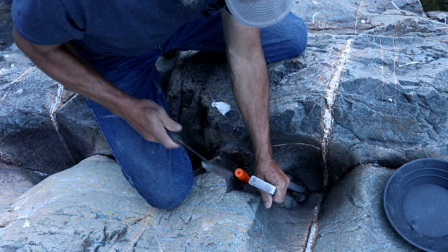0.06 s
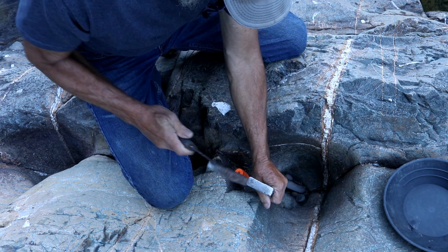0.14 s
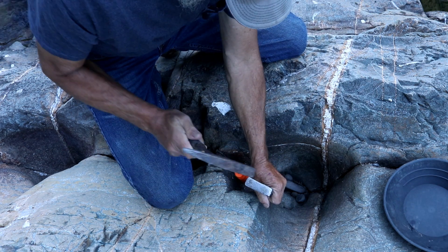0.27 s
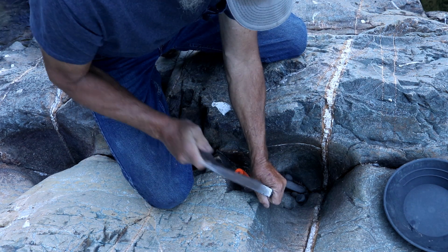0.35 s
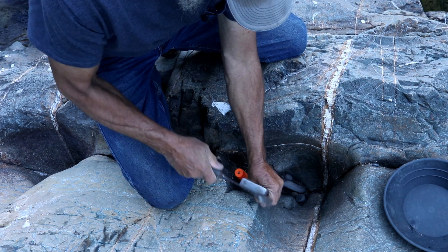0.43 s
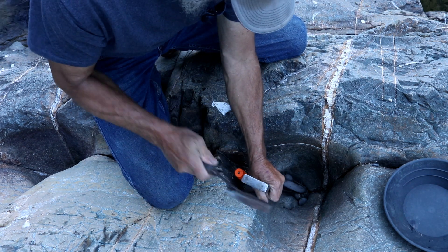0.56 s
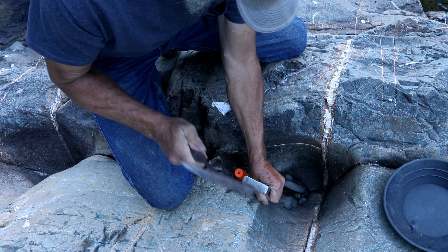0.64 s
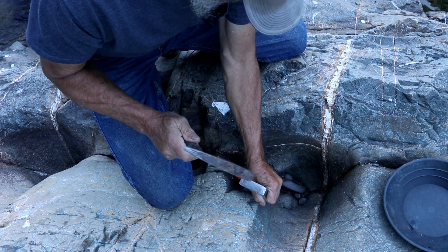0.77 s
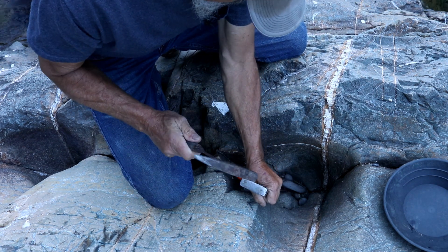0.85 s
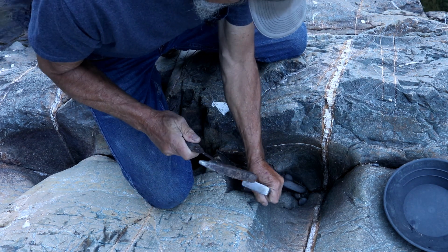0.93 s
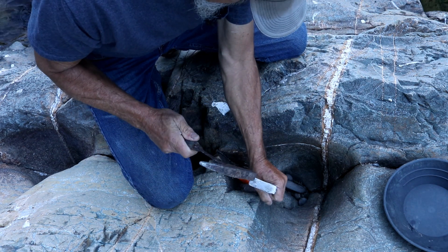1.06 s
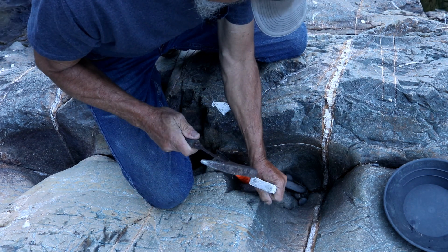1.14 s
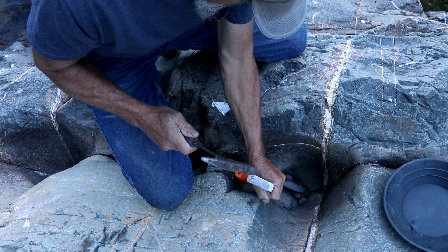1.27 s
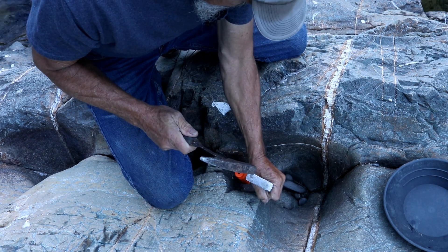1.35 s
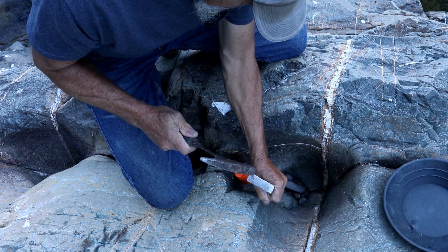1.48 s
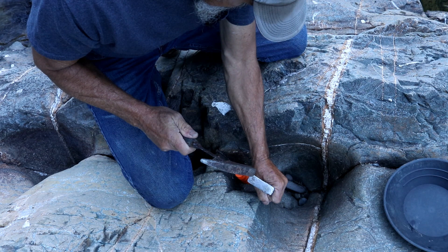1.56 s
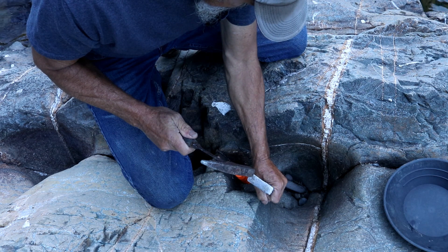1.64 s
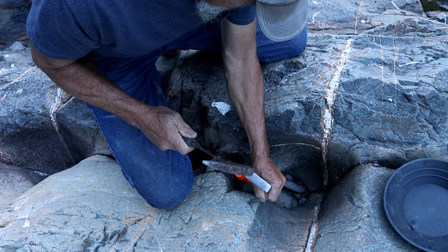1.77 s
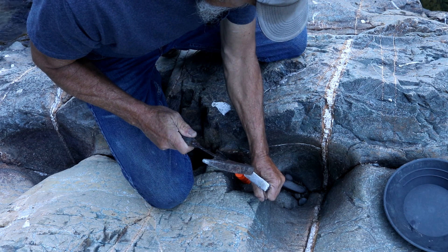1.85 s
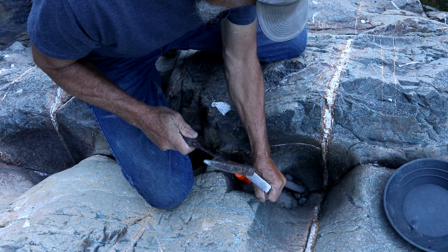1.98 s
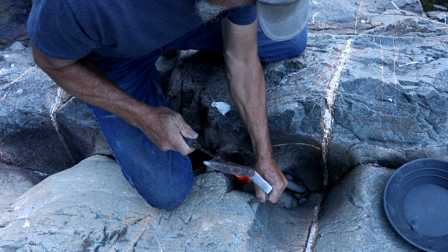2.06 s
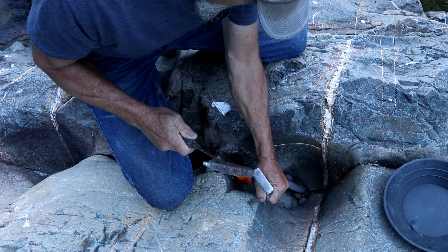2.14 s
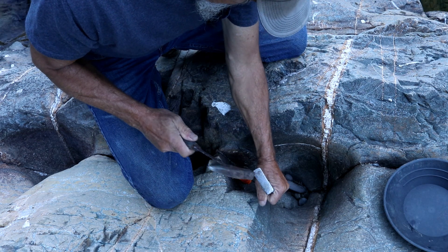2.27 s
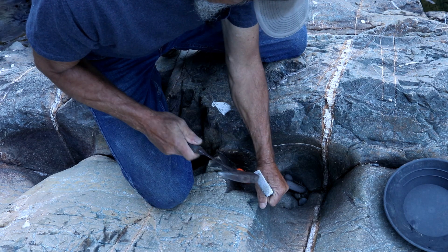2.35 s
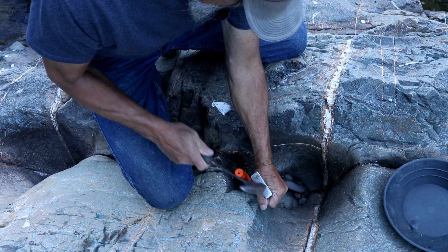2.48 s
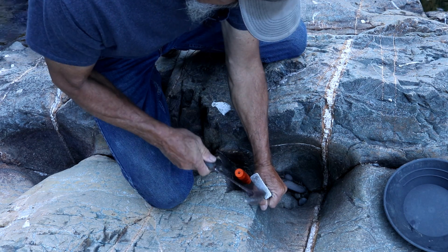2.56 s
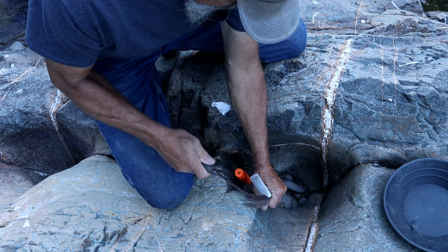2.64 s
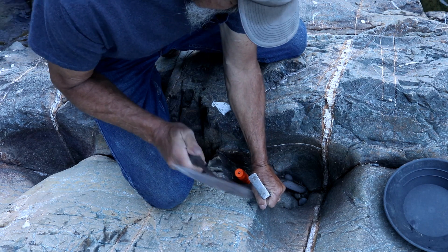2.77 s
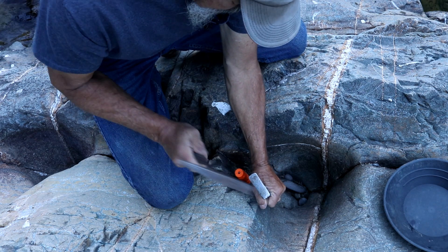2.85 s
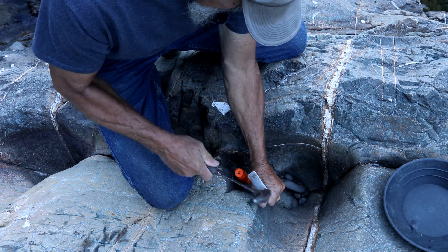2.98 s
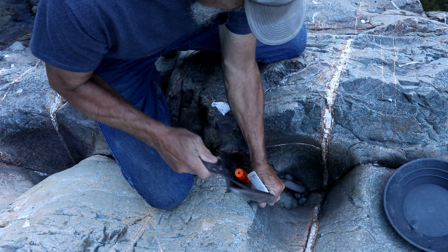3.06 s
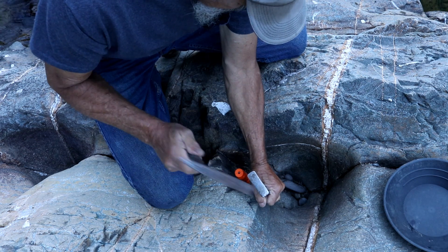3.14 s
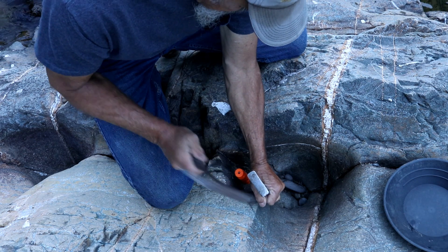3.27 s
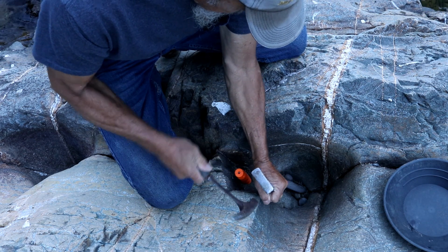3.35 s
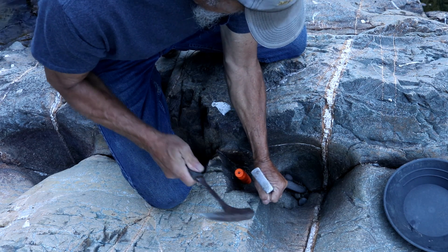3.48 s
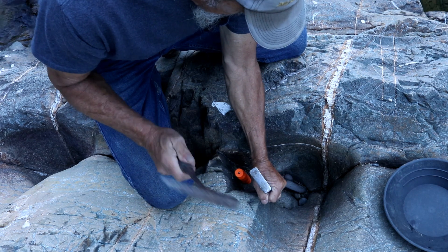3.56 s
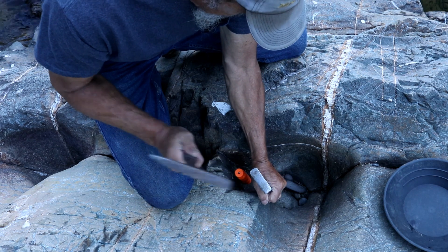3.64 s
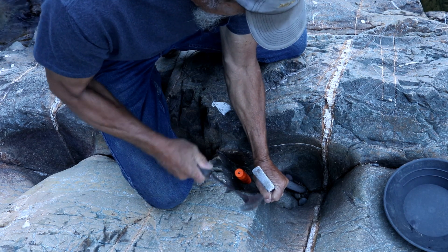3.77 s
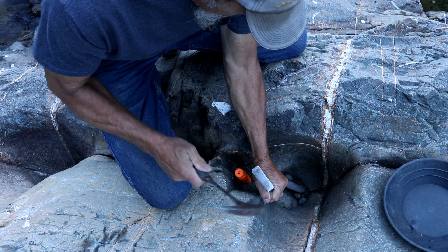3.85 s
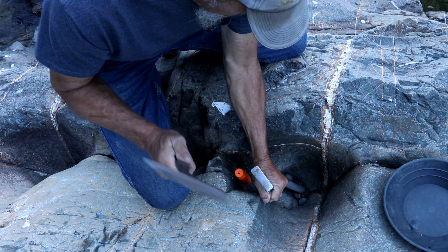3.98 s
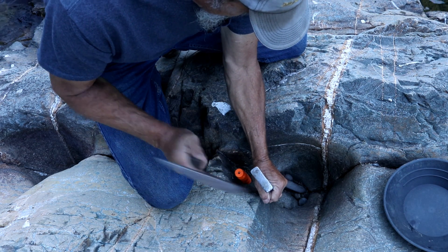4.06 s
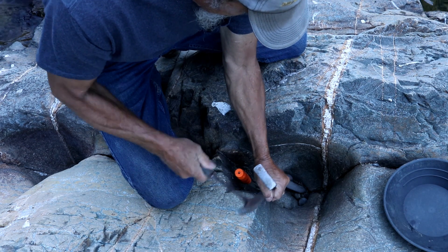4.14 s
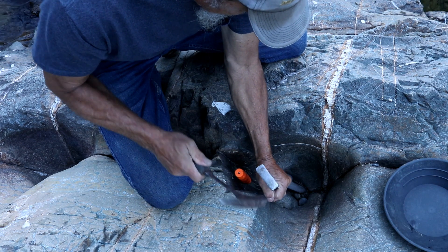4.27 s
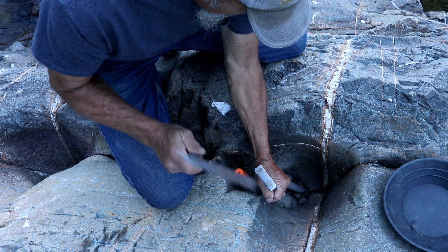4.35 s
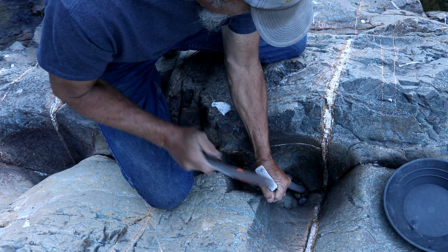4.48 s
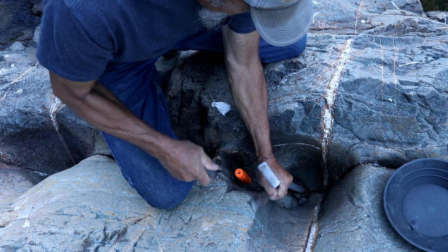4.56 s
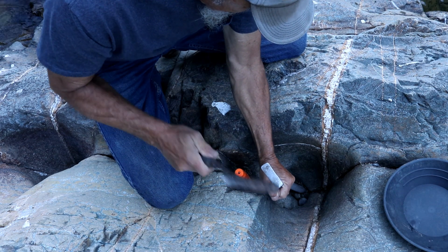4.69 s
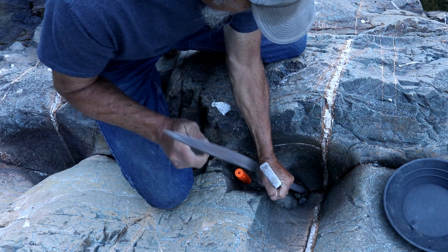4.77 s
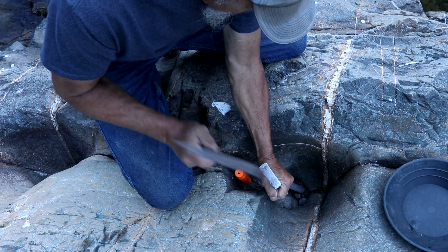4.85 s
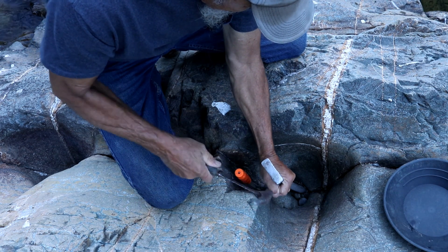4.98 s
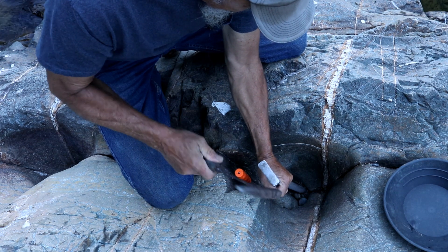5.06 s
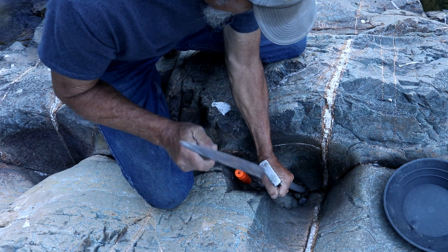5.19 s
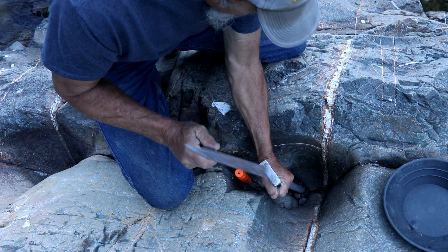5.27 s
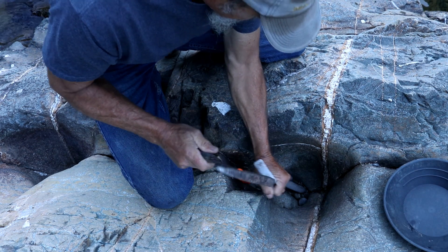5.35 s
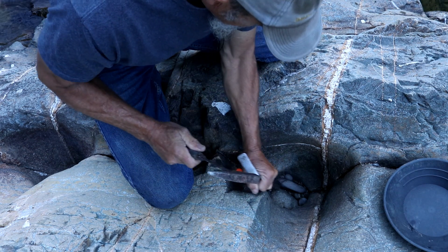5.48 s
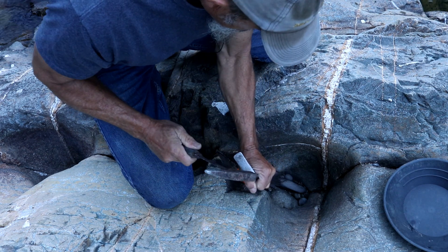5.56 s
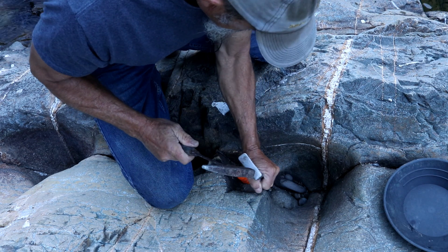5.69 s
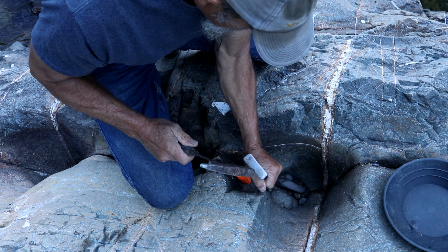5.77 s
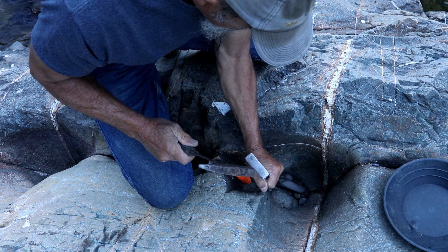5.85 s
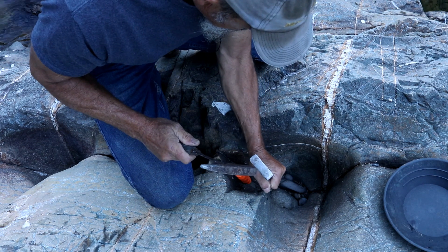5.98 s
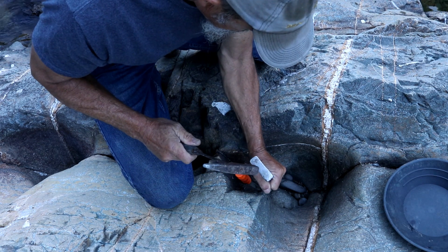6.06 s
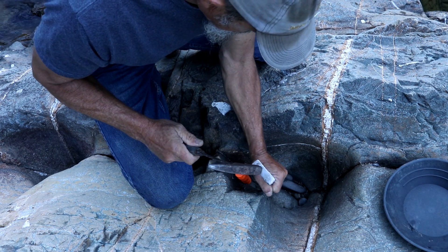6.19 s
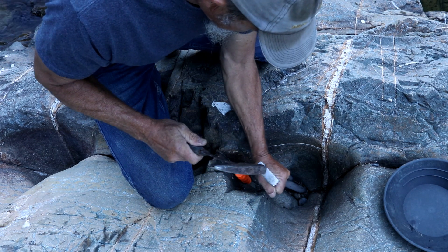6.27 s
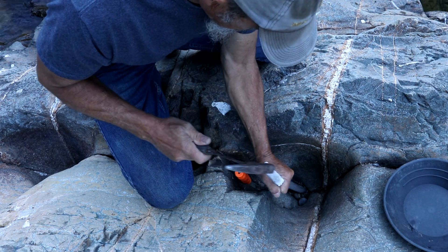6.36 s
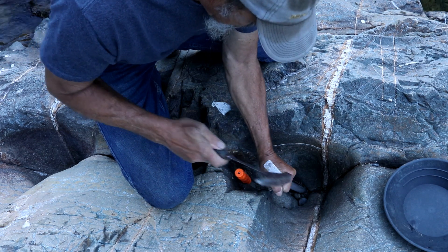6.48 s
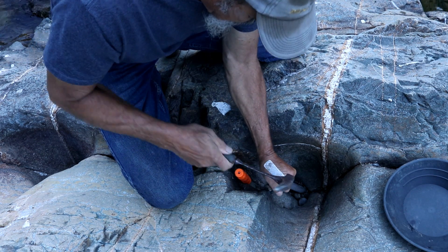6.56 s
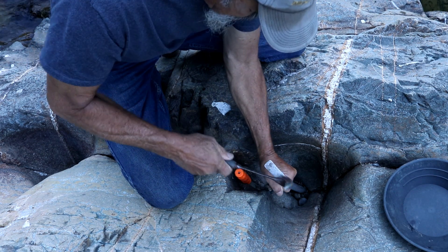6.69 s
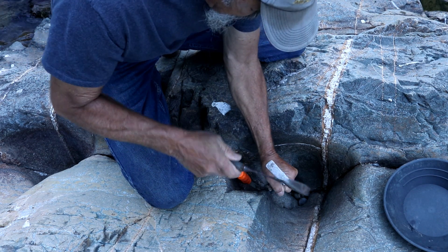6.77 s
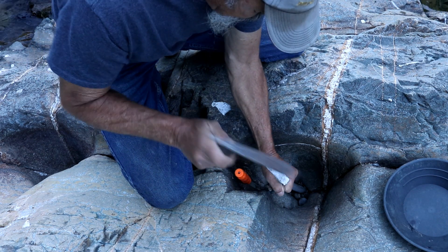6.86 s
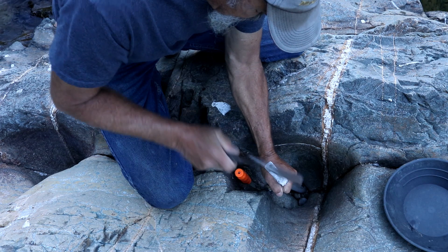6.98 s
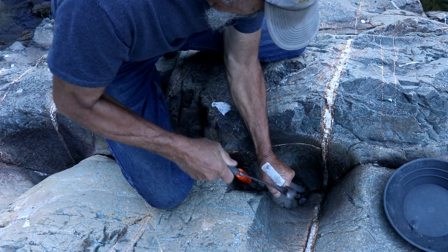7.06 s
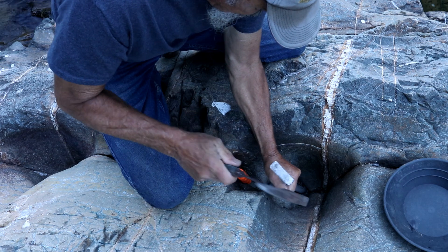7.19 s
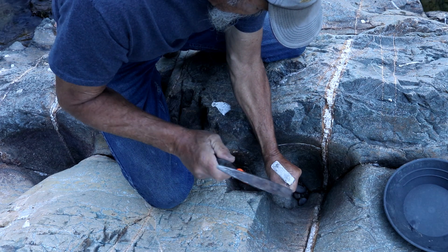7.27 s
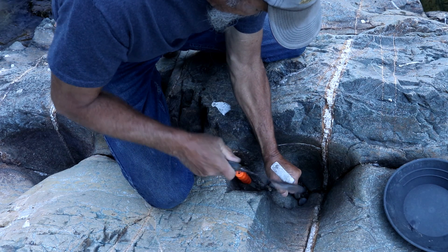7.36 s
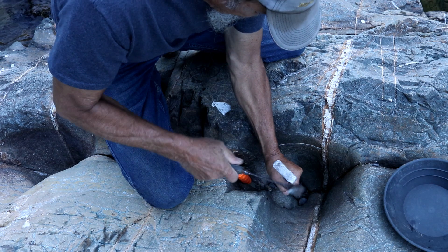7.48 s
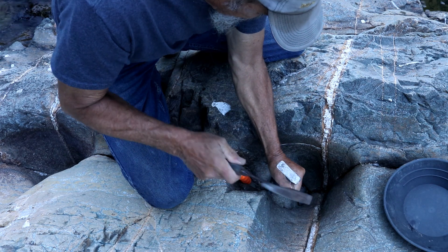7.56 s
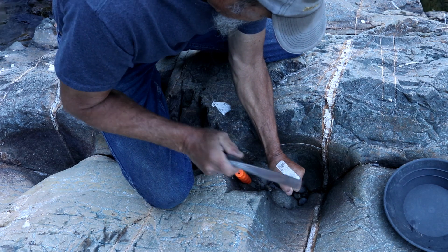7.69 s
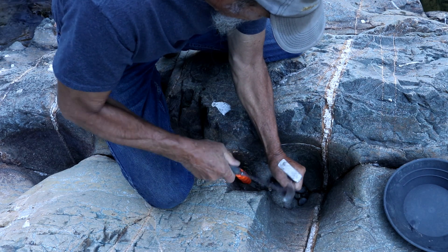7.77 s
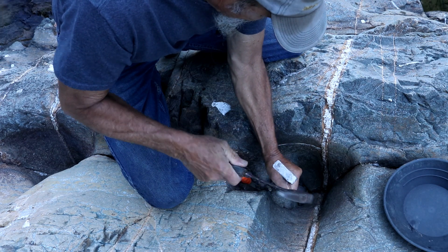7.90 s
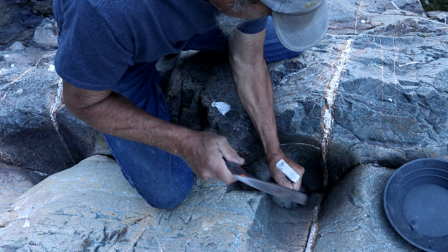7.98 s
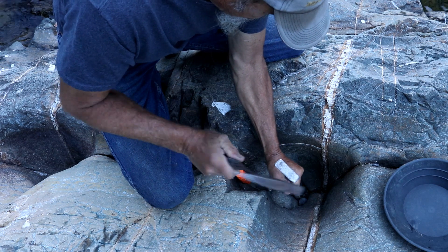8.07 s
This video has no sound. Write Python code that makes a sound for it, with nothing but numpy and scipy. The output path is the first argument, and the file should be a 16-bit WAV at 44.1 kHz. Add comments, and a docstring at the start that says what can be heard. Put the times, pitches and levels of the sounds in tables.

```python
"""Beside a stream, a hammer drives a steel tool into a rock crevice.
Each blow is a gritty crack of crushed rock (decaying noise), a short steel ring and a thud (decaying sines).
The blows can overload the microphone; after some, the hammer drops back on the steel more weakly.
Nearby rock faces throw the sounds back, as smeared echoes and a thin scatter.
Between the bursts the tools touch the stone and each other lightly; the stream is steady, churning noise."""
import sys
import numpy as np
from scipy import signal
from scipy.io import wavfile

SR = 44100
rng = np.random.default_rng(int(sys.argv[2]) if len(sys.argv) > 2 else 0)


def store_wav(level_fs):
    """Save 16-bit WAV to argv[1]."""
    pcm = np.round(np.clip(np.atleast_2d(level_fs), -1, 1) * 32767)
    wavfile.write(sys.argv[1], SR, pcm.T.astype(np.int16))


N = 358533   # length of the scene in samples
BAND_EDGES_HZ = 22 * 2 ** np.arange(0, 9.9, 1 / 3)   # three bands to the octave


def from_db(db):
    """Turn decibels into a gain."""
    return 10 ** (np.asarray(db) / 20)


def rms_one(x):
    """Scale a sound to an rms level of one."""
    return x / np.sqrt(np.mean(x ** 2) + 1e-20)


def at_hz(points, hz):
    """Read a table of (Hz, value) between its points, on a log-frequency axis."""
    table_hz, values = np.array(points).T
    return np.interp(np.log(hz), np.log(table_hz), values)


def add(out, start_s, sound):
    """Mix a sound in at a time in seconds."""
    start = round(start_s * SR)
    out[start:start + len(sound)] += sound[:N - start]


def low_pass(x, hz):
    """Dull a sound gently above a frequency, with one pole."""
    return signal.sosfilt(signal.butter(1, hz, fs=SR, output="sos"), x)


def fade(t, t60):
    """Decay exponentially, reaching 60 dB down after t60 seconds."""
    return np.exp(-np.log(1000) * t / t60)


def mode(t, hz, t60):
    """One struck mode: a decaying sine of unit height that starts up or down at random."""
    sign = rng.choice([-1, 1])
    return sign * np.sin(2 * np.pi * hz * t) * fade(t, t60)


def noise_bands(size):
    """Give third-octave bands of unrelated noise, each as (centre Hz, samples)."""
    settling = SR // 4   # samples dropped while the filter settles
    for low, high in zip(BAND_EDGES_HZ, BAND_EDGES_HZ[1:]):
        band = signal.butter(2, [low, high], "band", fs=SR, output="sos")
        noise = signal.sosfilt(band, rng.standard_normal(size + settling))
        yield np.sqrt(low * high), noise[settling:]


def drift(rate):
    """Wander slowly through random points of unit spread, `rate` points a second."""
    points = rng.standard_normal(N // 100)
    return np.interp(np.arange(N) / SR * rate, np.arange(len(points)), points)


# The tone of the running water.
# Each row: frequency in Hz, relative level in dB per Hz.
STREAM_SPECTRUM = [(15, -65.5), (25, -21.5), (75, -4), (178, 1), (240, -8), (274, 1), (349, -3), (389, -4),
                   (804, -8.5), (1200, -15.5), (2920, -22), (9300, -34.5), (15500, -42)]


def stream(level_db=-36.5, churn_db=0.18, churn_rate=22):
    """Running water some way off: a soft rush of noise whose bands churn independently."""
    rush = 0
    for hz, noise in noise_bands(N):
        band_db = at_hz(STREAM_SPECTRUM, hz) + churn_db * drift(churn_rate)
        rush = rush + noise * from_db(band_db)
    return from_db(level_db) * rms_one(rush)


# The tone of rock crushed under the tip.
# Each row: frequency in Hz, relative level in dB per Hz.
CRUSH_SPECTRUM = [(40, -30), (120, -9.5), (300, -6.5), (900, -6), (1700, -1.5), (2200, -12.5), (2800, -6),
                  (4000, -4.5), (4800, 1), (5900, -11.5), (6900, -0.5), (9000, -15.5), (12000, -14),
                  (16000, -22.5)]
# How fast crushed rock falls silent at a force of 0 dB.
# Each row: frequency in Hz, time to fall by 60 dB in seconds.
CRUSH_DECAY = [(200, 0.027), (1500, 0.024), (3000, 0.038), (6000, 0.036), (14000, 0.035)]


def cracks(t, forces_db, stretch_per_db=0.1461):
    """One burst of crushing rock per force; each band dies at its own rate, and light blows die sooner."""
    stretch = np.exp(stretch_per_db * np.maximum(forces_db, -20))[:, None]
    steady, dying = 0, 0
    for hz, noise in noise_bands(len(forces_db) * len(t)):
        band = from_db(at_hz(CRUSH_SPECTRUM, hz)) * noise.reshape(len(forces_db), -1)
        steady = steady + band
        dying = dying + band * fade(t, at_hz(CRUSH_DECAY, hz) * stretch)
    return dying / np.std(steady)   # unit level before the decay


def chatter(t, depth=0.0044, rate=400):
    """Time that runs unevenly, as the tool rubs in its seat; `rate` is random speed points a second."""
    wobble = np.interp(t * rate, np.arange(len(t)), rng.standard_normal(len(t)))
    return t + depth * np.cumsum(wobble) / SR


# The ways the steel in the crevice can ring; the modes of one family are struck together.
# Each row: family, frequency in Hz, level within the family in dB,
# basic time to fall by 60 dB in seconds.
STEEL_MODES = [("bend", 2716, 0, .052), ("shaft", 3892, -5, .052), ("shaft", 10004, -2, .038),
               ("shank", 4648, 0, .048), ("clang", 2480, -8, .03), ("clang", 2975, -6, .036),
               ("clang", 4560, -3, .03), ("clang", 5285, 0, .034), ("clang", 5430, -5, .026),
               ("clang", 5820, -9, .025), ("clang", 6800, -3, .031), ("clang", 8480, -13, .028),
               ("seat", 1720, -8, .03), ("seat", 3445, -1, .042), ("seat", 4780, 5, .032),
               ("seat", 6120, -6, .025), ("neck", 4940, 0, .052), ("neck", 3300, -9, .048),
               ("neck", 6250, -10, .025), ("chime", 10015, 0, .04), ("chime", 10265, -2, .036),
               ("chime", 10590, -3, .036), ("chime", 12420, -14, .03), ("chime", 12700, -14, .035),
               ("chime", 13250, -15, .03), ("face", 11122, 0, .066)]
# How loud each family is under a blow of 0 dB that does not favour it.
# Each entry: family, level in dB.
FAMILY_LEVELS = {"bend": 0, "shaft": -7, "shank": -1, "clang": -1, "seat": -8.5, "neck": -7, "chime": -7.5,
                 "face": -8}


def steel(t, favoured, lead_db, length, seats_s, seated_t60=0.021, scatter_db=1.26, detune=0.0013):
    """The ring of struck steel; where the hammer lands decides which families of modes lead."""
    grip = fade(np.maximum(t - seats_s, 0), seated_t60)   # the rock grips the tool again and chokes it
    ring = 0
    for family, hz, db, t60 in STEEL_MODES:
        family_db = FAMILY_LEVELS[family] + (lead_db if family in favoured else 0)
        gain = from_db(family_db + db + scatter_db * rng.standard_normal())
        if family == "face":   # the hammer face has bounced clear and rings freely
            ring += gain * mode(t, hz, t60)
        else:                  # chatter against the rock makes the tool's pitch unsteady
            tuned_hz = hz * (1 + detune * rng.standard_normal())
            ring += gain * grip * mode(chatter(t), tuned_hz, t60 * length)
    return ring


# The hammer blows.
# Each row: start in seconds, force in dB, thud level in dB, thud frequency in Hz, ring length factor,
# seconds until the steel seats again, mode families the blow favours, their lead in dB.
HAMMER_BLOWS = [(0.5134, 0.5, -3, 91.6, 2.15, 0.049, "shaft shank", 15.5),
                (2.6198, -15, -22, 270, 0.65, .03, "seat neck", 15),
                (3.0179, -1, -5, 310, 0.64, .025, "shank seat neck", 17.5),
                (3.4202, -0.5, -3.5, 200, 0.97, 0.0053, "bend clang seat neck", 10),
                (3.8321, -1, -24, 150, 0.85, 0.0051, "clang neck chime", 12.5),
                (4.2247, 0.5, -9.5, 204, 0.85, 0.0075, "clang seat neck chime", 15),
                (4.62, -1, -24, 272, .59, 0.0078, "shank clang seat neck chime", 15.5),
                (5.0149, 1, 4, 380, 1.06, 0.027, "clang neck chime", 10),
                (6.724, -8, -8.5, 305, 0.81, .04, "neck", 15.5),
                (7.1160, 0, 0, 264, 0.66, 0.041, "neck chime face", 13),
                (7.4820, 0, -6.5, 177, 1.03, .019, "bend shaft shank neck chime", 10.5),
                (7.8580, 0, -17, 165, 1.4, 0.017, "bend", 16)]


def blows(crack_db=13.5, thud_cycles=9):
    """Force scales the crack and the ring together; the rock answers with a thud, the deeper the longer."""
    out, t = np.zeros(N), np.arange(SR // 6) / SR
    crushed = cracks(t, [blow[1] for blow in HAMMER_BLOWS])
    for blow, crack in zip(HAMMER_BLOWS, crushed):
        start_s, force_db, thud_db, thud_hz, length, seats_s, favoured, lead_db = blow
        clink = from_db(crack_db) * crack + steel(t, favoured, lead_db, length, seats_s)
        thud = mode(t, thud_hz, thud_cycles / thud_hz)   # 60 dB down after nine cycles
        add(out, start_s, from_db(force_db) * clink + from_db(thud_db) * thud)
    return out


# The hammer drops back on the steel after a blow.
# Each row: start in seconds, force in dB.
HAMMER_REBOUNDS = [(.5317, -16), (.551, -17), (.570, -21), (0.583, -30), (5.030, -13)]


def rebounds(crack_db=7, dull_hz=5000):
    """Weaker, quickly choked clinks that crush less rock; the softer contact holds less treble."""
    out, t = np.zeros(N), np.arange(SR // 6) / SR
    crushed = cracks(t, [force_db for start_s, force_db in HAMMER_REBOUNDS])
    for (start_s, force_db), crack in zip(HAMMER_REBOUNDS, crushed):
        ring = steel(t, favoured="shaft clang", lead_db=8, length=1, seats_s=0.014)
        add(out, start_s, from_db(force_db) * (from_db(crack_db) * crack + ring))
    return low_pass(out, dull_hz)


# Echoes from the rock faces.
# Each row: delay in seconds, spread in seconds (time to fall to about a third),
# level before dulling in dB, frequency in Hz above which it is dull.
ROCK_ECHOES = [(0.044, 0.0045, -42.5, 11300), (0.073, 0.0076, -44, 5000)]


def rock_faces(x, tail_db=-38, tail_t60=0.53, tail_delay=0.024, tail_hz=7000):
    """Smeared echoes from rock faces and a thin scatter from the boulders."""
    t = np.arange(SR) / SR

    def scatter(delay, t60):
        """A dense, dying cluster of reflections of unit energy."""
        burst = rng.standard_normal(len(t)) * (t > delay) * fade(np.abs(t - delay), t60)
        return burst / np.linalg.norm(burst)

    reflections = from_db(tail_db) * low_pass(scatter(tail_delay, tail_t60), tail_hz)
    for delay, spread, db, hz in ROCK_ECHOES:
        echo = scatter(delay, spread * np.log(1000))   # spread turned into a 60 dB time
        reflections = reflections + from_db(db) * low_pass(echo, hz)
    return signal.fftconvolve(x, reflections)[:N]


# The light touches of tools and stone.
# Each row: start in seconds, what rings, level in dB before the soft contact dulls it.
LIGHT_TOUCHES = [(0.8124, "tool", -32), (.8498, "tool", -39), (0.888, "tool", -43), (1.1960, "grit", -33),
                 (1.222, "grit", -39), (1.4375, "grit", -41), (1.694, "grit", -28), (1.7020, "grit", -24),
                 (2.0738, "stone", -30.5), (5.5400, "hammer", -44.5), (5.8909, "hammer", -30),
                 (6.046, "hammer", -31), (6.046, "grit", -32), (6.1146, "hammer", -34),
                 (6.15, "hammer", -42)]
# What a light touch sets ringing, listed under the name of what rings.
# Each row: frequency in Hz, level within the touch in dB, time to fall by 60 dB in seconds.
TOUCH_RINGS = {"tool": [(2740, -2.5, 0.072), (3910, -0.5, 0.08), (5250, -8, .06), (6850, -14, .05),
               (8540, -8, .05)], "grit": [(1710, -5.5, 0.031), (2765, 3.5, 0.02), (3945, -3.5, 0.044),
               (5280, 2.5, 0.025), (6870, -12, 0.05)], "stone": [(2410, 2.5, 0.067), (3410, 6, 0.045),
               (4480, -8, 0.055), (5599, -22, .05)], "hammer": [(2480, -10, .06), (2985, 4, 0.15),
               (3840, -28, .06), (4500, -9, 0.033), (5730, -3, 0.024), (7760, -22, .04)]}


def touches(scuff_db=-4, scuff_t60=0.04, contact_hz=8000):
    """Each light touch is a short scuff and a few ringing modes; a soft contact holds little treble."""
    out, t = np.zeros(N), np.arange(SR // 5) / SR
    scuff_band = signal.butter(2, [2000, 7000], "band", fs=SR, output="sos")
    for start_s, body, level_db in LIGHT_TOUCHES:
        rubbing = rms_one(signal.sosfilt(scuff_band, rng.standard_normal(len(t))))
        scuff = rubbing * fade(t, scuff_t60)
        ring = sum(from_db(db) * mode(t, hz, t60) for hz, db, t60 in TOUCH_RINGS[body])
        add(out, start_s, from_db(level_db) * (ring + from_db(scuff_db) * scuff))
    return low_pass(low_pass(out, contact_hz), contact_hz)


def scene():
    """The stream, the tool work and its echoes, on one channel."""
    water = stream()
    work = blows() + rebounds() + touches()
    return (water + work + rock_faces(work))[None]


def record(dry, ceiling=0.72, cutoff_hz=15800):
    """An overloaded microphone clips peaks flat at the ceiling; the top treble is then cut."""
    fine = signal.resample_poly(dry, 2, 1, axis=-1)   # clip at twice the rate to limit aliasing
    clipped = signal.resample_poly(np.clip(fine, -ceiling, ceiling), 1, 2, axis=-1)
    top_cut = signal.firwin(201, cutoff_hz, fs=SR)
    return signal.fftconvolve(clipped, top_cut[None], mode="same", axes=-1)


dry = scene()
out = record(dry)
store_wav(out)
```